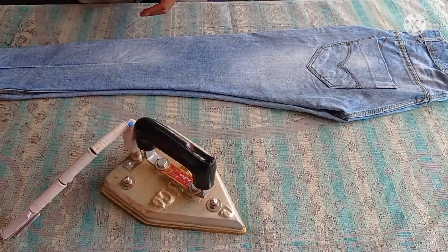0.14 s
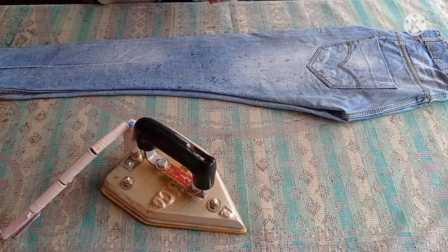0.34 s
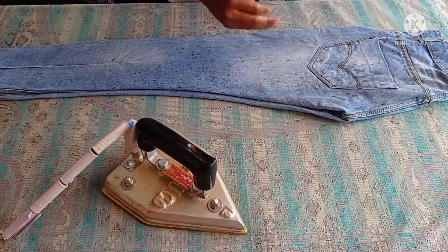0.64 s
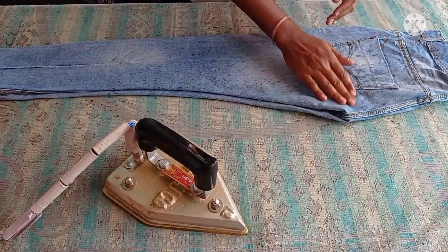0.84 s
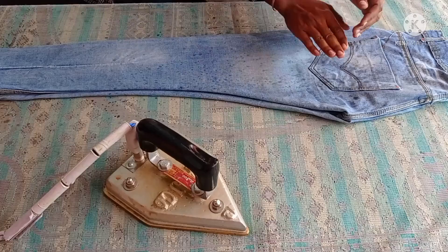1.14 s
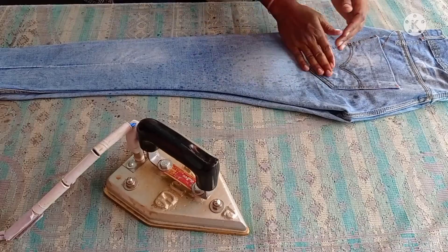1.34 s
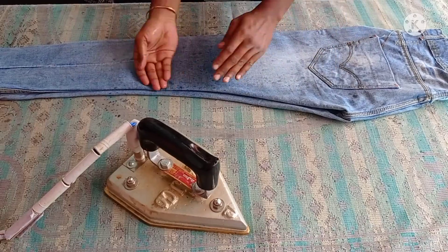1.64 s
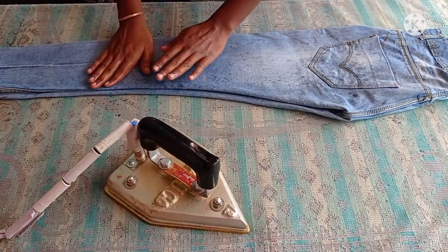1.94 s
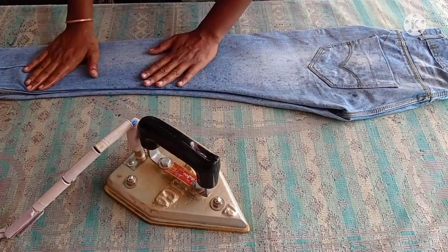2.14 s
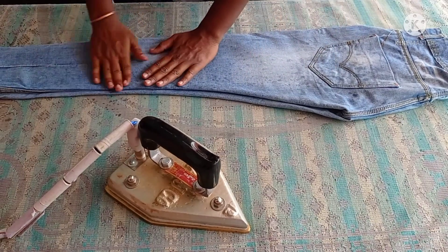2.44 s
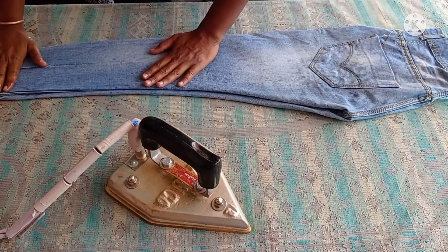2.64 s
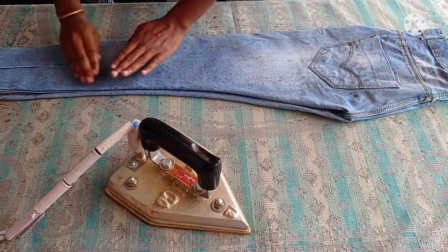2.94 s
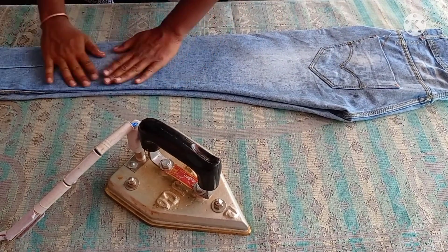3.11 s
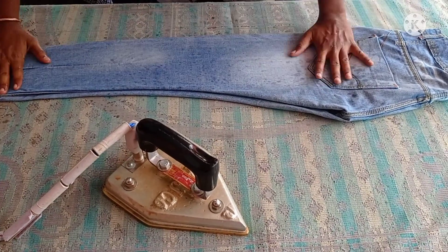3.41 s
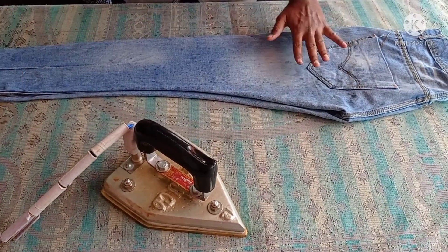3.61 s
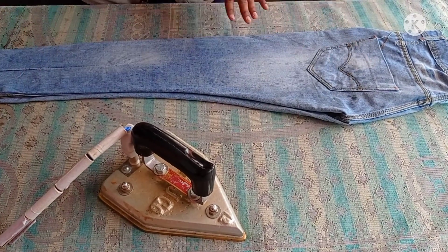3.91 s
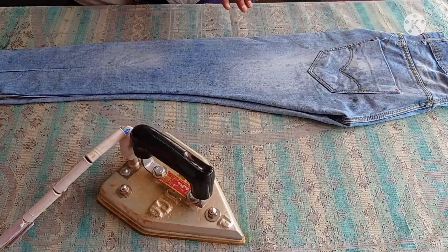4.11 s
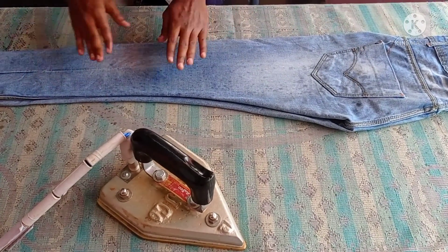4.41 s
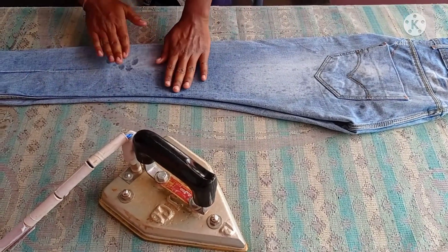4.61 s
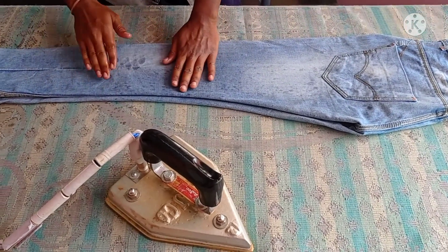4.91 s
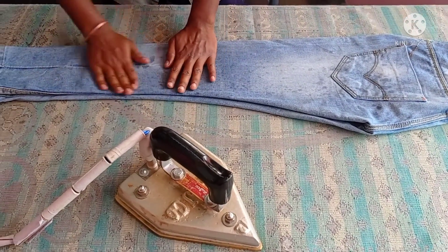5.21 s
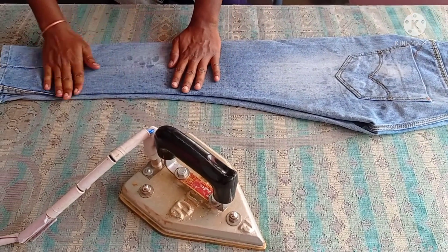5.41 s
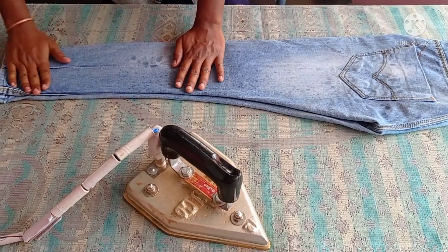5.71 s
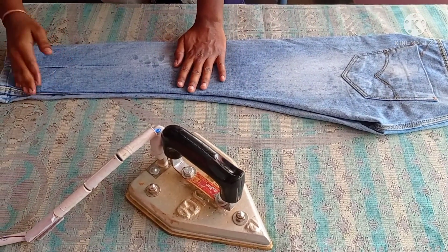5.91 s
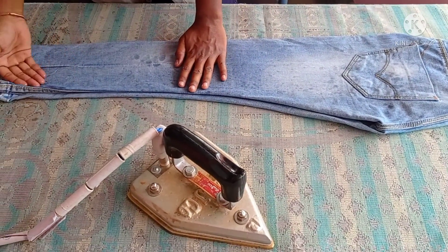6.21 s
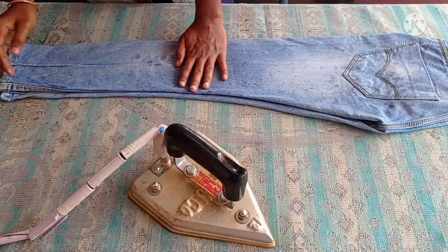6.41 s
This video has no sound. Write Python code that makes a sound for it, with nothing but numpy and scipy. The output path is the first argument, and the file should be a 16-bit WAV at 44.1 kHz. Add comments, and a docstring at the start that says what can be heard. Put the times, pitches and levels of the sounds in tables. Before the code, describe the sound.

In a small bare room, close to a phone microphone, wet fingers flick water onto jeans in light pattering bursts. Palms then pat the denim with firm, woody thuds, the nearby iron rattling slightly. Dry strokes rasp and hiss along the cloth. More water and another cluster of pats follow, the iron clinking again, then final short strokes. Birds whistle and squawk faintly outside.

```python
"""A small room with a cloth-covered table, close to a phone's microphone: jeans are readied for ironing.
Palms pat the denim flat, ringing table and room modes under a noise slap; the heavy iron on the table
rattles as clacks with ringing shell modes. Strokes over denim, settling spray and a sleeve's rustle are
dense clicks turned to hiss and rasp; wet fingers flick water as many tiny taps. Fingers tick and soft
bumps fall close by. Outside, birds whistle, call and squawk as gliding tones and rough noise, over quiet air."""
import sys
import numpy as np
from scipy import signal
from scipy.fft import rfft, irfft
from scipy.io import wavfile

SR = 44100
rng = np.random.default_rng(int(sys.argv[2]) if len(sys.argv) > 2 else 0)


def to_wav(sig):
    """Store sig (one row per channel, or 1-D mono) as 16-bit WAV at the path in sys.argv[1].

    Samples outside -1..1 are clipped; the rate is SR.
    """
    pcm = np.clip(np.atleast_2d(sig), -1, 1) * 32767
    pcm = np.round(pcm).astype(np.int16)
    wavfile.write(sys.argv[1], SR, pcm.T)  # frames by channels


N = 288855
TIME = np.arange(N) / SR

# palm pats: t/s, level/dB, thud cut-off f/Hz (firmness), slap decay/s, landing time/s
PATS = [(1.081, -31.5, 635, 0.0063, 0.0055), (1.104, -36.5, 130, 0.0031, 0.0022),
        (1.4431, -25.5, 570, 0.0044, 0.0015), (1.4852, -33.5, 704, 0.0025, 0.002),
        (1.845, -38, 233, .0042, 0.00096), (2.264, -39.5, 202, 0.0027, 0.001),
        (4.244, -39, 127, 0.0062, 0.0033), (4.701, -30, 305, 0.0048, 0.0028),
        (4.857, -26, 500, 0.003, 0.0013), (4.981, -29, 235, 0.0024, 0.0016),
        (5.091, -47.5, 115, 0.003, .0022), (6.322, -37, 300, 0.0086, 0.002)]
# fingertips landing ahead of a palm: t/s, level/dB, decay/s
FINGERTIPS = [(1.0745, -57, .008), (1.4357, -36, 0.0049)]
# modes of the table top: f/Hz, level/dB, t60/s
TABLE_MODES = [(120.3, -1.5, 0.071), (180.6, -6, 0.077), (257, -5, 0.077), (314.7, -0.5, 0.063),
               (383.4, 0, 0.071), (436, 0, 0.056), (527.5, 4, 0.033), (699, -11.5, .07), (1060, -11.5, 0.1),
               (1230, -9, 0.13)]
# standing waves of the room: f/Hz, level/dB, t60/s
STANDING_WAVES = [(61.4, -21, 0.77), (87.4, -21.5, 0.96), (126.35, -13, 0.54), (177, -16, 0.37),
                  (258.2, -18.5, 0.34), (384.2, -16, 0.34)]
# spectrum of the palm's slap: f/Hz, relative level/dB
SLAP_SPECTRUM = [(100, -4), (400, 7), (1300, 3), (2500, -2.5), (4000, -5.5), (7000, -18), (10000, -23.5),
                 (15000, -45)]
# clacks of the iron's loose parts: t/s, level/dB, upper shell modes relative to lower/dB
RATTLES = [(1.452, -53, 1), (1.469, -42, -0.5), (1.485, -39.5, -2), (4.73, -40.5, -2.5), (4.874, -37.5, 0),
           (4.885, -44, -3), (4.895, -45.5, -1), (4.983, -49.5, -9)]
# modes of the iron's shell: f/Hz, relative level/dB, t60/s
IRON_MODES = [(2070, -13.5, 0.1), (2346, -10, 0.18), (2494, -6.5, 0.11), (2563, -6, 0.25),
              (2822, -2.5, 0.055), (2970, -3.5, 0.049), (3746, -4, 0.061), (3853, 0.5, .11),
              (3986, 0, 0.11), (4030, -7, 0.04)]
# strokes over denim, a fine spray settling (0.65 s) and a sleeve's rustle (4.095 s):
# t/s, length/s, rise/s, hiss level before swell/dB, rasp relative to hiss/dB
RUSTLES = [(0.65, 0.63, 0.017, -69.5, -4), (1.831, 0.12, 0.014, -68.5, 1.5), (2.231, 0.11, 0.034, -60, 4.5),
           (2.481, 0.12, 0.035, -66.5, 4), (2.655, 0.15, 0.065, -56.5, 3), (3.27, 0.28, 0.14, -51, 1.5),
           (3.657, 0.17, 0.015, -75.5, -1), (4.095, 0.29, 0.2, -69.5, 5.5), (5.367, 0.14, 0.048, -58.5, 4),
           (5.82, 0.093, 0.04, -56, 5), (6.424, 0.1, 0.044, -70, 2)]
# spectrum of the hiss on the weave: f/Hz, relative level/dB
HISS_SPECTRUM = [(1200, -14.5), (3000, -5.5), (4500, 4.5), (7000, -1.5), (11000, -6), (15500, -13)]
# spectrum of the lower rasp: f/Hz, relative level/dB
RASP_SPECTRUM = [(40, -10), (130, 0.5), (300, -8.5), (500, -4.5), (800, -13.5), (1300, -6.5), (2600, -4),
                 (4000, -4.5), (6500, -51.5)]
# flicks of water: t/s, level/dB, shower decay/s, first drops' f/Hz
FLICKS = [(0.504, -43.5, 0.053, 2492), (0.534, -42.5, 0.062, 988), (0.631, -41.5, 0.035, 4370),
          (0.818, -41.5, 0.026, 2984), (0.857, -46, 0.041, 1401), (4.246, -46, 0.039, 1953)]
# taps and snaps of the fingers: t/s, level/dB, decay/s, centre f/Hz
TICKS = [(.633, -46.5, 0.0032, 3540), (2.16, -60.5, 0.031, 1740), (4.244, -50, 0.0034, 2630),
         (4.264, -41, 0.015, 3350), (4.98, -59, 0.0018, 5400), (6.221, -41.5, 0.0022, 3270)]
# soft dull bumps close to the microphone: t/s, level before shaping/dB, f/Hz
BUMPS = [(.449, -46, 125), (0.476, -44, 129), (2.696, -45, 117), (3.127, -46, 100.6), (3.15, -50.5, 104),
         (4.0087, -36, 120.6), (4.026, -37.5, 118), (4.052, -41.5, 117), (5.994, -42.5, 100),
         (6.016, -41.5, 96)]
# one bird's falling whistle: t/s, length/s, start f/Hz, level/dB
WHISTLES = [(2.072, .034, 4420, -65.5), (2.106, 0.071, 4040, -54.5), (2.426, 0.13, 4470, -55.5),
            (3.727, 0.092, 4030, -62)]
# other bird calls: t/s, length/s, start f/Hz, end f/Hz, level/dB, hoarseness/share of pitch
BIRD_CALLS = [(2.919, 0.28, 1495, 1130, -72, 0.0885), (3.967, 0.094, 3860, 3370, -68, .04),
              (4.104, 0.078, 3140, 2746, -72, 0.039), (4.244, 0.024, 5550, 5240, -57.5, 0.0122),
              (4.332, .24, 3900, 4430, -59.5, 0.07), (4.137, 0.077, 279.3, 319, -56.5, 0.13),
              (6.095, 0.038, 3480, 4250, -62.5, 0.046), (6.147, 0.083, 4200, 3240, -61.5, .04)]
# distant squawks: t/s, length/s, rasp level/dB, voice relative to rasp/dB
SQUAWKS = [(-.08, 0.22, -70.5, -14), (1.369, 0.15, -68, -1), (2.931, 0.19, -69.5, -5.5),
           (5.317, 0.1, -64, -3), (6.039, 0.2, -65.5, -2)]
# throat resonances of the squawking bird: f/Hz, relative level/dB
SQUAWK_THROAT = [(2400, -11.5), (3400, 8.5), (4900, 1.5), (6600, -8.5), (7500, -9.5), (10000, -26)]
# spectrum of the outdoor air: f/Hz, relative level/dB
AIR_SPECTRUM = [(25, -18), (70, 2), (130, 3), (300, -4), (600, -9), (1800, -15), (2450, -9), (3000, -16),
                (3800, -14), (7000, -23), (15000, -38)]
# echo of the room: f/Hz, t60/s
ROOM_DECAY = [(100, 0.61), (400, 0.36), (1200, 0.48), (2600, 0.36), (5000, 0.45), (12000, 0.043)]
# response of the microphone port: f/Hz, level/dB
MIC_RESPONSE = [(1800, 1), (2600, 6.5), (3300, 1), (5000, 0.5), (6800, 6.5), (8000, -5), (9500, 0),
                (12500, -5), (14000, 0), (15100, 10)]

STANDING_BUILD_S = 0.021


def undb(db):
    """Decibels to gain."""
    return 10 ** (np.asarray(db) / 20)


def unit(x):
    """Scale to rms 1."""
    return x / np.sqrt(np.mean(x ** 2))


def read(points, hz):
    """Read (Hz, value) points on a log-frequency axis."""
    f, value = np.transpose(points)
    return np.interp(np.log(np.maximum(hz, 1)), np.log(f), value)


def colour(x, points):
    """Causal filter with a (Hz, dB) response, built from its cepstrum."""
    size = 4096
    cepstrum = irfft(np.log(undb(read(points, np.fft.rfftfreq(size, 1 / SR)))))
    # fold the cepstrum onto positive time: minimum phase
    cepstrum[1:size // 2] *= 2
    cepstrum[size // 2 + 1:] = 0
    impulse = irfft(np.exp(rfft(cepstrum)))
    return signal.fftconvolve(x, impulse)[:len(x)]


def band(x, low_hz, high_hz, order=2):
    """Band-pass."""
    edges = [low_hz, min(high_hz, .48 * SR)]
    return signal.sosfilt(signal.butter(order, edges, "band", fs=SR, output="sos"), x)


def walk(rate_hz):
    """Random wander: straight lines between normal random points."""
    knots = rng.standard_normal(int(TIME[-1] * rate_hz) + 2)
    return np.interp(TIME * rate_hz, np.arange(len(knots)), knots)


def add(track, s, sound):
    """Mix a sound in at time s."""
    i = int(s * SR)
    track[i:i + len(sound)] += sound[:N - i]


def ring(modes, t, gains=1):
    """Decaying modes, each a sine starting from zero."""
    hz, db, t60 = np.transpose(modes)[:, :, None]
    decay = np.exp(-np.log(1000) * t / t60)
    return np.sum(gains * undb(db) * np.sin(2 * np.pi * hz * t) * decay, axis=0)


def reach(modes, cut_hz):
    """How strongly a cushioned blow drives each mode: less above its cut-off."""
    return 1 / np.sqrt(1 + (np.array(modes)[:, :1] / cut_hz) ** 4)


def standing_boom(t, cut_hz):
    """A blow sets the room's standing waves ringing, and they build up gradually."""
    waves = ring(STANDING_WAVES, t, reach(STANDING_WAVES, cut_hz))
    return waves * (1 - np.exp(-t / STANDING_BUILD_S))


def pats(detune=0.0068, place_db=3.0, slap_db=2.52, slap_knee_hz=192.6, pad_db=-15.5, pad_s=0.024):
    """A palm squeezes out air and rings table and room; softer blows reach low modes and hardly slap."""
    out, t = np.zeros(N), TIME[:SR]
    hz, mode_db, t60 = np.transpose(TABLE_MODES)
    sides = (-1) ** np.arange(len(hz))  # neighbouring modes swing in opposite senses
    for s, pat_db, cut_hz, decay_s, land_s in PATS:
        # each landing place favours other modes, and the palm's load detunes them
        place, load = rng.standard_normal((2, len(hz)))
        modes = np.column_stack([hz * (1 + detune * load), mode_db + place_db * place, t60])
        thud = ring(modes, t, sides[:, None] * reach(TABLE_MODES, cut_hz))
        boom = standing_boom(t, cut_hz)
        firmness = 1 / (1 + (slap_knee_hz / cut_hz) ** 4)
        slap = unit(colour(rng.standard_normal(SR), SLAP_SPECTRUM)) * np.exp(-t / decay_s)
        # padded cloth and table frame shudder in a dense, irregular thud
        pad = unit(band(rng.standard_normal(SR), 300, 750)) * np.exp(-t / pad_s)
        noise = firmness * (undb(slap_db) * slap + undb(pad_db) * pad)
        landing = 1 - np.exp(-t / land_s)
        add(out, s, undb(pat_db) * (thud + boom + noise) * landing)
    for s, tip_db, decay_s in FINGERTIPS:
        tip = unit(band(rng.standard_normal(SR), 900, 3400, order=4))
        add(out, s, undb(tip_db) * tip * np.exp(-t / decay_s))
    return band(out, 36, SR / 2)  # the table top radiates no deep bass


def rattles(clack_s=0.0027, place_db=2, reseat=0.003, split_hz=3400):
    """The iron's loose parts drop back: each clack rings the shell with a different mix of modes."""
    out, t = np.zeros(N), TIME[:SR // 2]
    hz, mode_db, t60 = np.transpose(IRON_MODES)
    for s, db, upper_db in RATTLES:
        # the parts sit differently every time, which detunes the modes by a share
        place, seat, sense = rng.standard_normal((3, len(hz)))
        mix_db = mode_db + place_db * place + upper_db * (hz > split_hz)
        modes = np.column_stack([hz * (1 + reseat * seat), mix_db, t60])
        shell = ring(modes, t, .5 * np.sign(sense)[:, None])
        clack = unit(band(rng.standard_normal(len(t)), 1000, 3580, order=5)) * np.exp(-t / clack_s)
        add(out, s, undb(db) * (shell + clack))
    return out


def threads(spectrum, grain_db, judder_db):
    """Countless tiny contacts with the threads: dense uneven clicks, coming a little in waves."""
    grain = np.repeat(rng.standard_normal(N // 24 + 1), 24)[:N]  # each level holds for 24 samples
    clicks = rng.standard_normal(N) * undb(grain_db * grain)
    return unit(colour(clicks, spectrum) * undb(judder_db * walk(140)))


def swelling(s, length_s, rise_s, release_s, swell_db=1.4):
    """The level of one rustle: it eases in, swells as a hand gathers speed would, and dies away."""
    age = TIME - s
    attack = np.sin(np.pi / 2 * np.clip(age / rise_s, 0, 1)) ** 2
    swell = undb(swell_db * (np.clip(age / length_s, 0, 1) - 1.5))
    return attack * swell * np.exp(-np.maximum(age - length_s, 0) / release_s)


def rustles(uneven_db=2.4, hiss_release_s=0.0238, rasp_release_s=0.031, rasp_rise=0.9):
    """Strokes, settling spray and a sleeve hiss on the weave, each with a lower, more uneven rasp."""
    out = np.zeros(N)
    hiss = threads(HISS_SPECTRUM, grain_db=1.5, judder_db=1.0)
    rasp = threads(RASP_SPECTRUM, grain_db=2.0, judder_db=2.0) * undb(uneven_db * walk(30))
    for s, length_s, rise_s, db, rasp_db in RUSTLES:
        out += undb(db) * swelling(s, length_s, rise_s, hiss_release_s) * hiss
        # the rasp builds in a share of the rise time
        out += undb(db + rasp_db) * swelling(s, length_s, rasp_rise * rise_s, rasp_release_s) * rasp
    return out


def flicks(scatter_db=3, pitch_spread=0.43, cycles=0.65, sorting=0.64, rise_s=0.0065, cushion=0.083):
    """Drops land as dead little taps: fine fast ones first, heavy slow ones later and lower."""
    out, t = np.zeros(N), TIME[:256]
    count = 1600  # drops in a flick
    for s, db, decay_s, first_hz in FLICKS:
        late_hz = 0.56 * first_hz
        rate = 1.3 * first_hz  # 1 / rms gap between drops: finer spray is denser
        gap, pitch, size = rng.standard_normal((3, count))
        age = np.cumsum(np.abs(gap)) / rate
        fall = np.exp(-age / decay_s / sorting)
        hz = late_hz * (first_hz / late_hz) ** fall * np.exp(pitch_spread * pitch)
        hz = np.minimum(hz, SR / 3)
        shower = np.exp(-age / decay_s) * (1 - np.exp(-age / rise_s))
        sizes = undb(db + scatter_db * size) * shower * 1.58 * np.sqrt(hz / rate)
        turns = hz[:, None] * t
        dents = np.sin(2 * np.pi * turns) * np.exp(-turns / cycles) * (1 - np.exp(-turns / cushion))
        # the air follows the speed of the dent
        taps = np.diff(dents) * (sizes * SR / (2 * np.pi * hz))[:, None]
        for when, tap in zip(np.minimum(s + age, TIME[-1]), taps):
            add(out, when, tap)
    return out


def splashes(thump_db=-7, cut_hz=110):
    """The weight of each flick of water stirs a faint low boom."""
    out = np.zeros(N)
    thump = standing_boom(TIME[:SR], cut_hz)
    for s, db, decay_s, _ in FLICKS:
        add(out, s + decay_s, undb(db + thump_db) * thump)
    return out


def ticks(spread=1.06):
    """Sharp finger taps and snaps: decaying noise around one pitch."""
    out, t = np.zeros(N), TIME[:4096]
    for s, db, decay_s, hz in TICKS:
        snap = band(rng.standard_normal(len(t)), hz / spread, hz * spread, order=1)
        snap = band(snap, hz / 3, 14000)
        add(out, s, undb(db) * unit(snap) * np.exp(-t / decay_s))
    return out


def bumps(length_cycles=0.29):
    """One slow push and pull of air for each bump, with a slight rebound."""
    out = np.zeros(N)
    for s, db, hz in BUMPS:
        turns = hz * (TIME - s)
        bell = np.exp(-.5 * np.minimum((turns / length_cycles) ** 2, 100))
        out += undb(db) * np.sin(2 * np.pi * turns) * bell
    return band(out, 62, 900, order=3)


def note(s, length_s, start_hz, end_hz, hoarse):
    """One gliding bird note that swells and fades, its pitch shaken by hoarseness."""
    u = np.clip((TIME - s) / length_s, 0, 1)
    hz = start_hz * (end_hz / start_hz) ** u * (1 + hoarse * walk(1500))
    return np.tanh(2 * np.sin(np.pi * u)) * np.sin(2 * np.pi * np.cumsum(hz) / SR)


def birds(flutter_db=2.5, fall_per_s=2.35, whistle_hoarse=0.0046):
    """A repeated thin falling whistle among chirps, hoarse calls and a low coo."""
    out = np.zeros(N)
    for s, length_s, hz, db in WHISTLES:
        end_hz = hz * np.exp(-fall_per_s * length_s)  # the log of the pitch falls steadily
        out += undb(db) * note(s, length_s, hz, end_hz, whistle_hoarse)
    for s, length_s, start_hz, end_hz, db, hoarse in BIRD_CALLS:
        out += undb(db) * note(s, length_s, start_hz, end_hz, hoarse)
    return out * undb(flutter_db * walk(100))


def squawks(pitch_hz=818, hoarse=0.014, waver=0.0088):
    """A harsh bird voice: shaky upper harmonics and rasping air through one throat."""
    hz = pitch_hz * (1 + hoarse * walk(900) + waver * walk(40))
    phase = 2 * np.pi * np.cumsum(hz) / SR
    harmonics = sum(np.sin(k * phase) for k in range(6, 11))
    voice = unit(colour(harmonics, SQUAWK_THROAT))
    rasp = unit(colour(rng.standard_normal(N), SQUAWK_THROAT))
    out = np.zeros(N)
    for s, length_s, db, voice_db in SQUAWKS:
        swell = np.sin(np.pi * np.clip((TIME - s) / length_s, 0, 1))
        out += undb(db) * swell * (rasp + undb(voice_db) * voice)
    return out


def room(x, build_s=0.0024, bass_db=-4):
    """Diffuse echo of bare walls: noise dying octave by octave, thinner in the bass."""
    t, tail = TIME[:SR], 0
    for hz in 125 * 2 ** np.arange(8):
        octave = band(rng.standard_normal(SR), hz / np.sqrt(2), hz * np.sqrt(2))
        decay = np.exp(-np.log(1000) * t / read(ROOM_DECAY, hz))
        tail = tail + undb(bass_db * (125 / hz) ** 2) * octave * decay
    tail = tail * (1 - np.exp(-t / build_s))
    return signal.fftconvolve(x, tail / np.sqrt(np.sum(tail ** 2)))[:N]


def outdoors(level_db=-73.8, swell_db=1):
    """Quiet outdoor air: broad noise whose level swells slowly."""
    out = 0
    for hz in 40 * 2 ** np.arange(10.0):
        out = out + band(rng.standard_normal(N), hz / np.sqrt(2), hz * np.sqrt(2))
    return unit(colour(out, AIR_SPECTRUM)) * undb(level_db + swell_db * walk(1))


def scene(table_echo_db=-5.5, iron_echo_db=-4.0, cloth_echo_db=-11, bird_echo_db=-9):
    """Table, iron, cloth and birds echo in one room; the bumps are too close to echo."""
    table = pats() + splashes()
    iron = rattles()
    cloth = rustles() + flicks() + ticks()
    calls = birds() + squawks()
    sent = undb(table_echo_db) * table + undb(iron_echo_db) * iron
    sent = sent + undb(cloth_echo_db) * cloth + undb(bird_echo_db) * calls
    return (table + iron + cloth + calls + room(sent) + bumps() + outdoors())[None]


def record(dry, top_hz=15650):
    """The phone's microphone port colours the treble; a steep low-pass cuts the top."""
    heard = colour(dry[0], MIC_RESPONSE)
    return signal.sosfilt(signal.ellip(10, .2, 70, top_hz, fs=SR, output="sos"), heard)[None]


dry = scene()
out = record(dry)
to_wav(out)
```